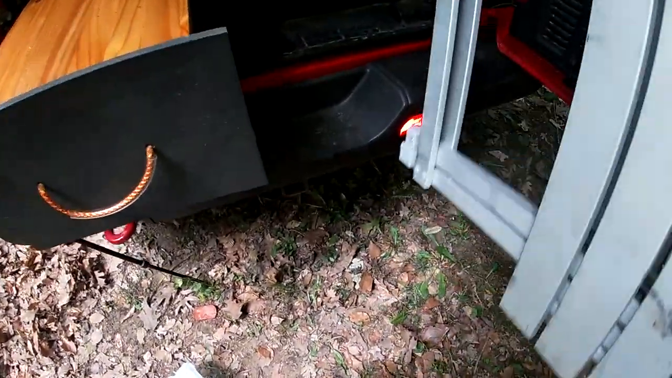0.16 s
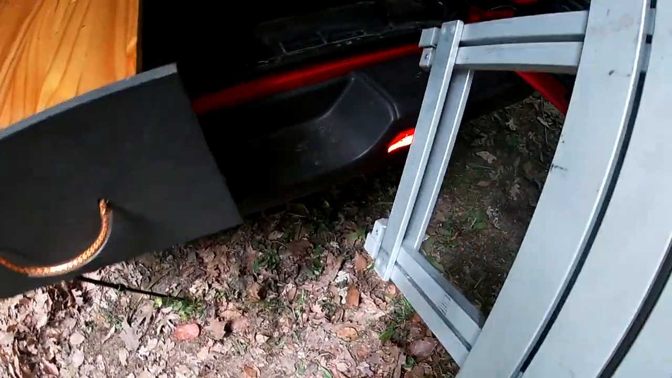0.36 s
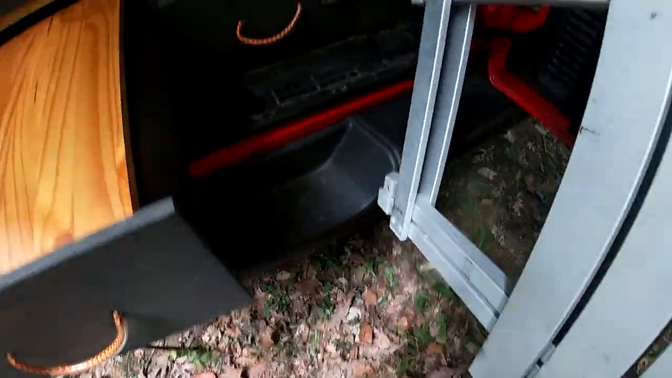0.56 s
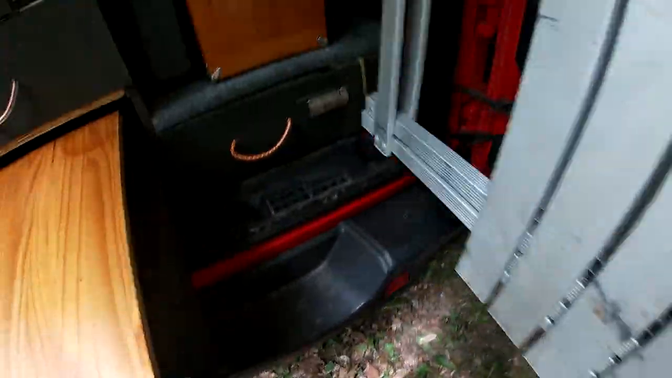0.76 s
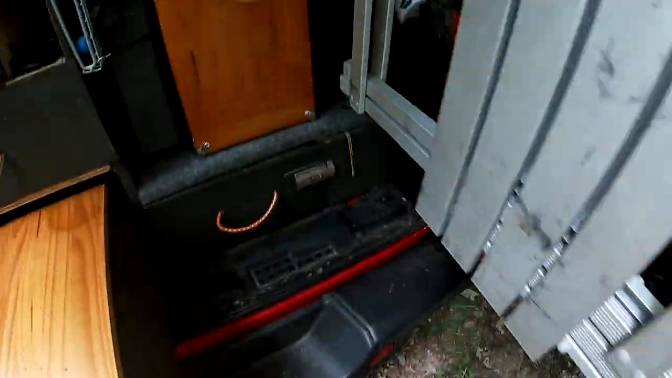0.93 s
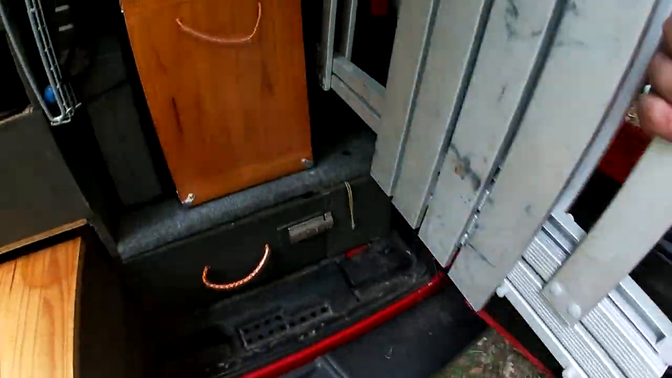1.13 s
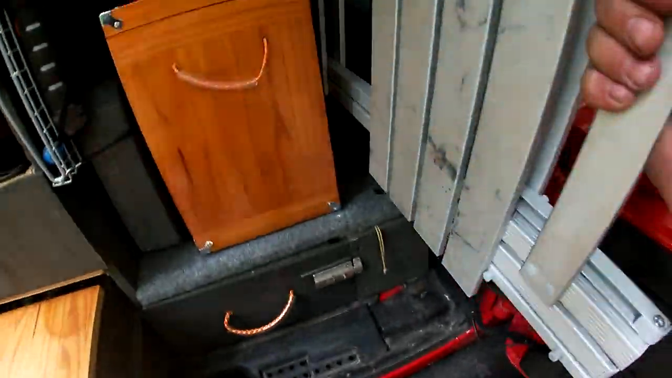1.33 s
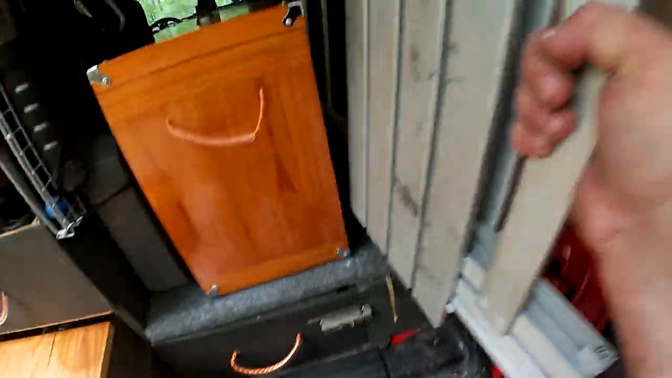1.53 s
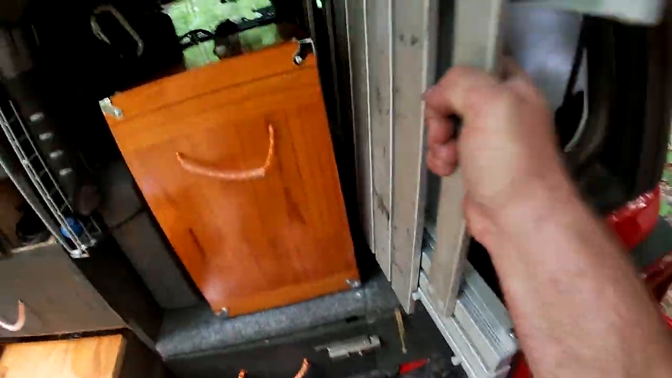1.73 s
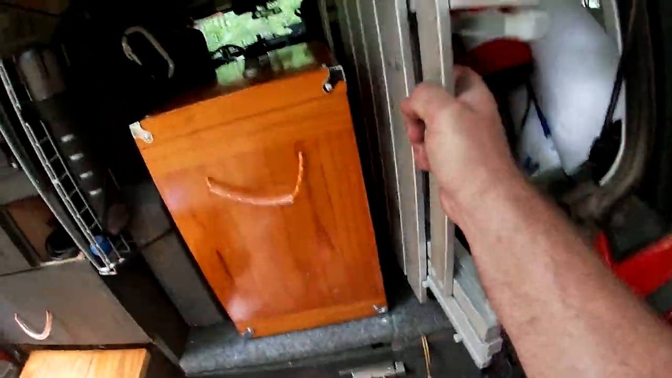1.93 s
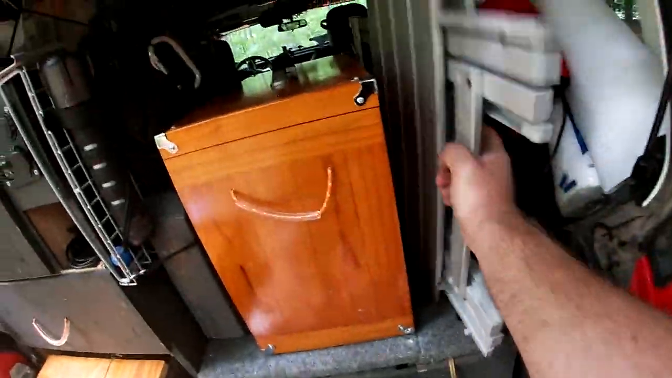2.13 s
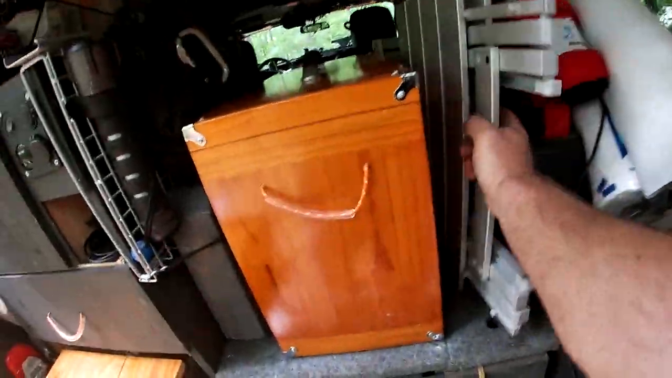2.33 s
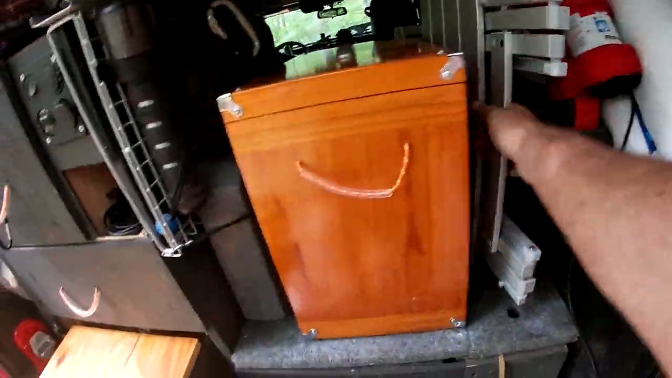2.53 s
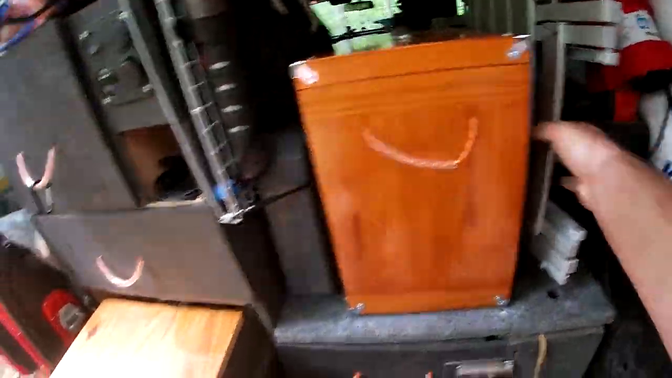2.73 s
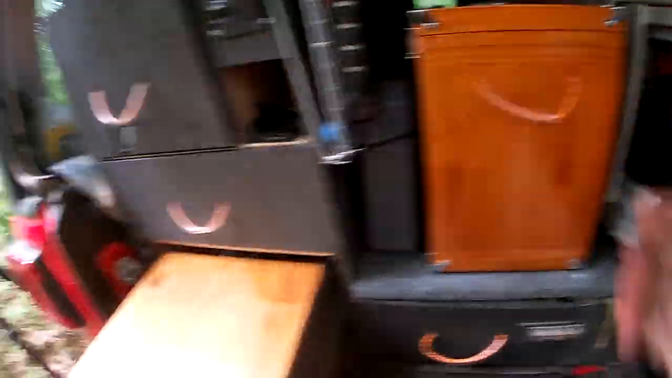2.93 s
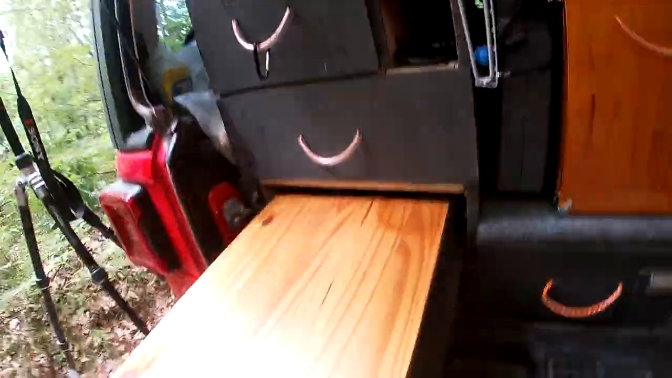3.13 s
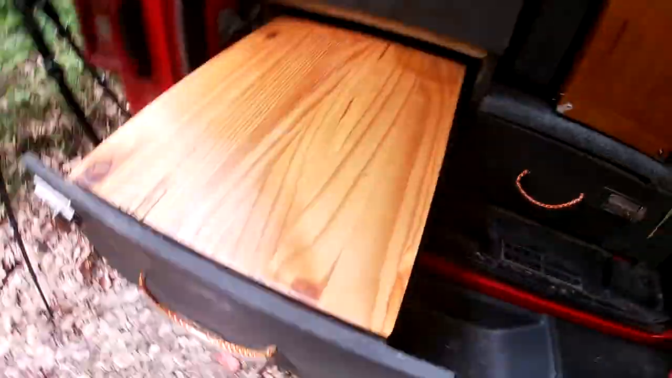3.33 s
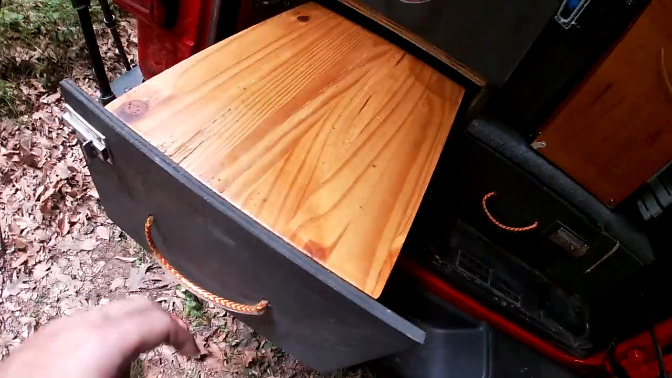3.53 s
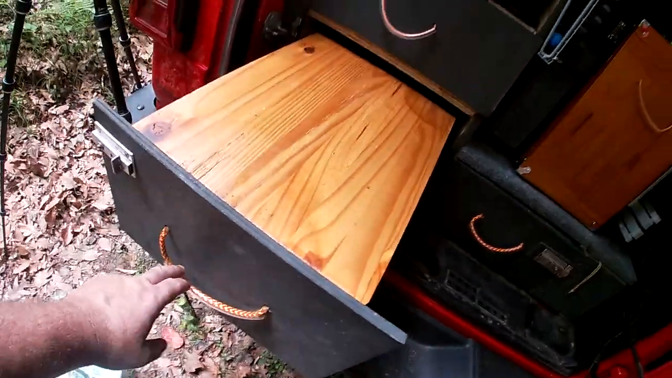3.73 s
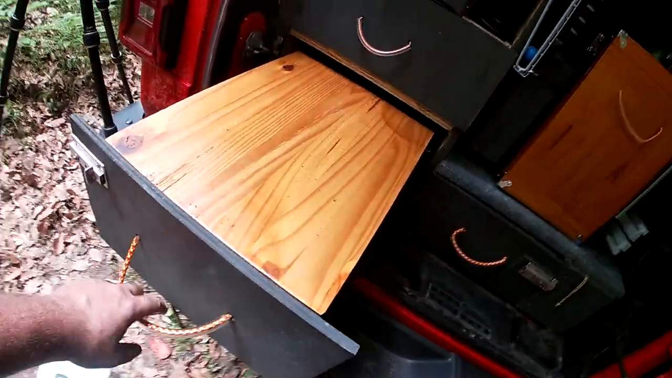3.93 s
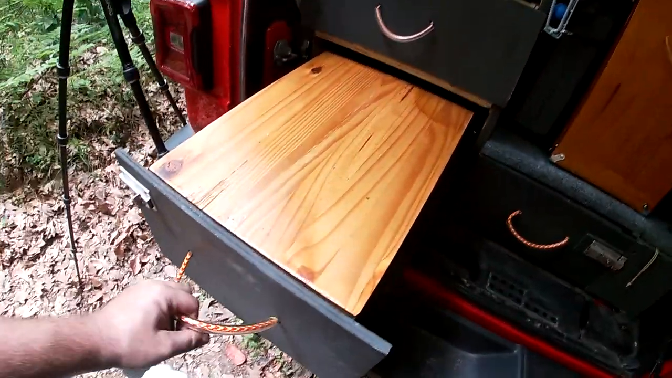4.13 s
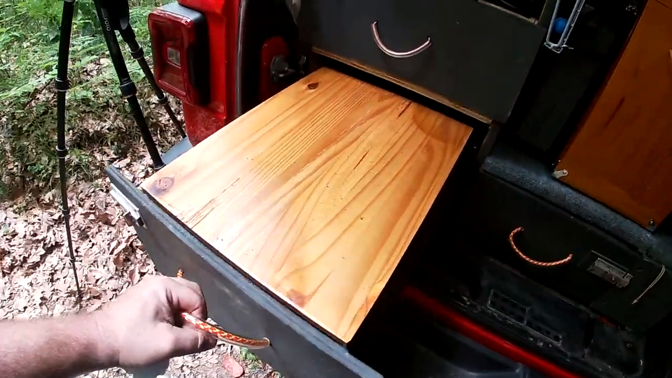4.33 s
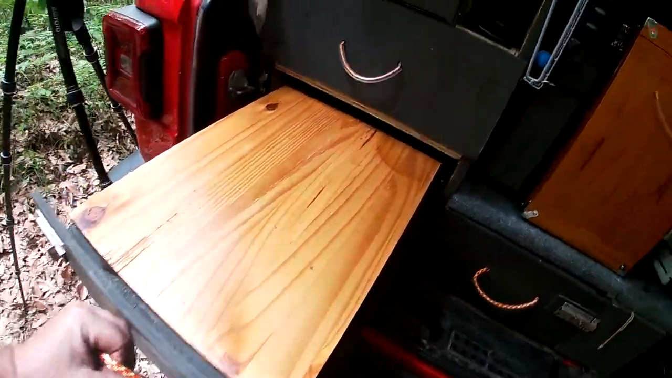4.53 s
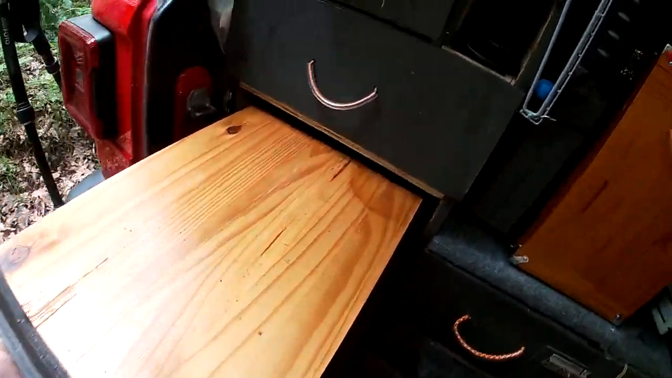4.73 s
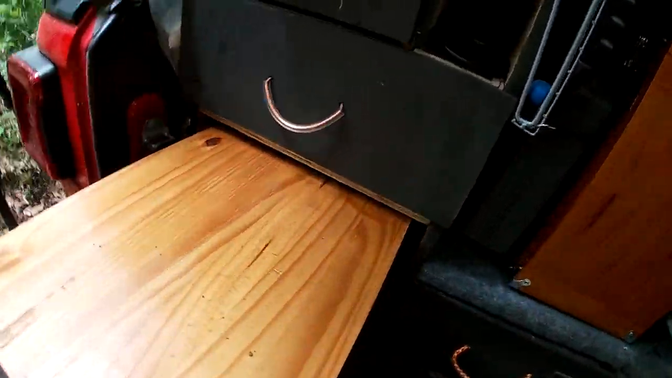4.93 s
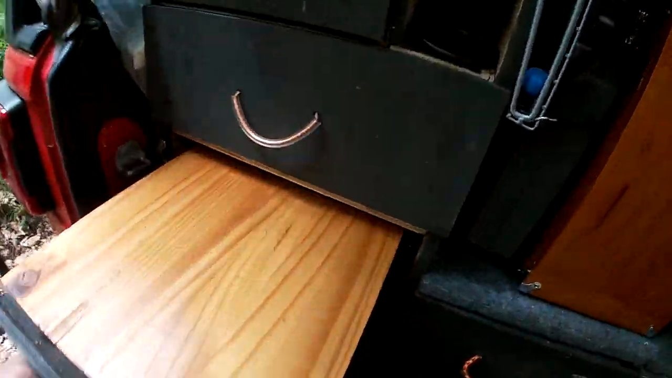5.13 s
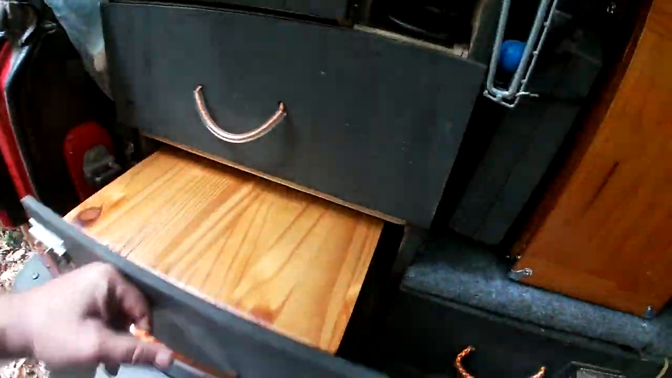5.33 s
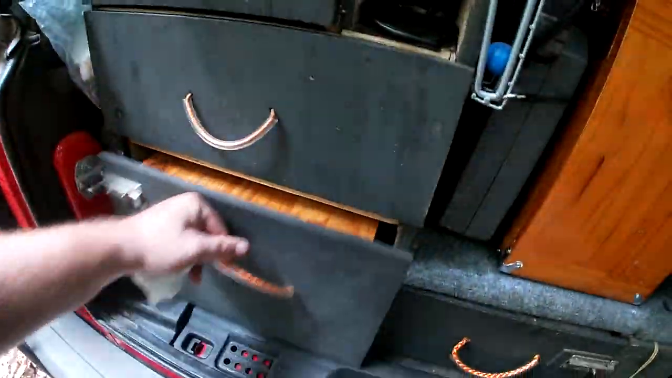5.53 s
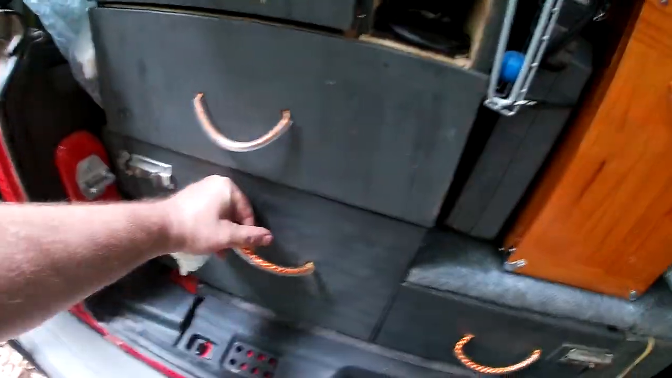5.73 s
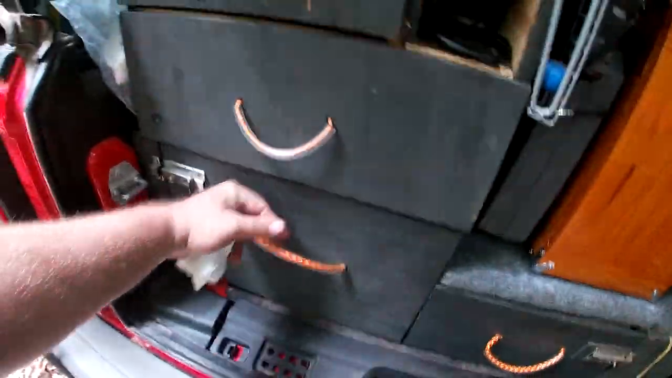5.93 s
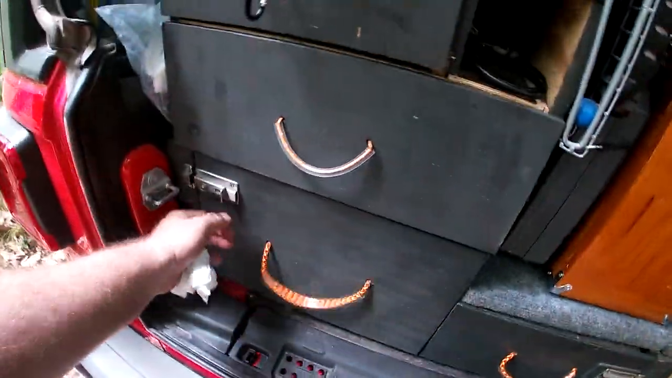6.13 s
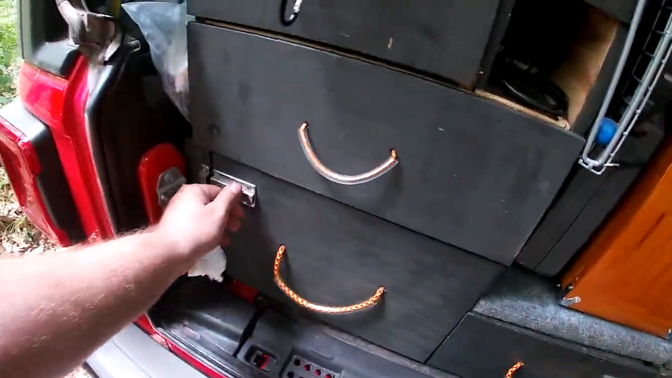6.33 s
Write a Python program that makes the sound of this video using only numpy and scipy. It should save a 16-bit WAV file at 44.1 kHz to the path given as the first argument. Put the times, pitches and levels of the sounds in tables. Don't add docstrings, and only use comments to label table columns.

```python
import sys
import numpy as np
from scipy import signal
from scipy.fft import rfft, irfft, next_fast_len
from scipy.io import wavfile
from scipy.ndimage import uniform_filter1d, map_coordinates

SR = 44100
rng = np.random.default_rng(int(sys.argv[2]) if len(sys.argv) > 2 else 0)


def log_audio(samples):
    frames = np.atleast_2d(samples).T
    limited = np.clip(frames, -1, 1)
    pcm = np.round(limited * 32767).astype(np.int16)
    wavfile.write(sys.argv[1], SR, pcm)


def invert_db(level):
    return 10 ** (np.asarray(level, dtype=float) / 20)


N = 285327


def unit(x):
    return x / np.sqrt(np.mean(x ** 2) + 1e-20)


def curves(rows):
    s, *columns = np.transpose(rows)
    return [np.interp(np.arange(N) / SR, s, column) for column in columns]


def wobble(rate):
    knots = rng.standard_normal(int(N * rate / SR) + 4)
    return map_coordinates(knots, [np.arange(N) * rate / SR])


def swells(rows):
    t = np.arange(N) / SR
    total = np.zeros(N)
    for s, hold, db, rise, fall in rows:
        away = np.maximum((s - t) / rise, (t - s - hold) / fall)
        total += invert_db(db - 20 * np.maximum(0, away))
    return total


def shape(points):
    f, db = np.transpose(points)
    return lambda hz: invert_db(np.interp(np.log(hz + 1), np.log(f), db))


def body(peaks):
    high_hz, low_hz = 1.6 * peaks[-1][0], 0.5 * peaks[0][0]

    def response(f):
        modes = 0
        for k, (centre, width, db) in enumerate(peaks):
            damping = 1j * f * width
            modes = modes + (-1) ** k * invert_db(db) * damping / (centre * centre - f * f + damping)
        return modes / (1 + 1j * f / high_hz) ** 2 * (1j * f / (low_hz + 1j * f)) ** 2

    return response


def filtered(x, response):
    m = next_fast_len(N + SR // 2)
    gain = response(np.fft.rfftfreq(m, 1 / SR))
    gain = gain / np.sqrt(np.mean(abs(gain) ** 2))
    return irfft(rfft(x, m) * gain, m)[:N]


def gritty(spread_db, clump_db, clump_rate):
    uneven = np.minimum(rng.standard_exponential(N), 2 * np.pi)
    sizes = invert_db(spread_db * uneven + clump_db * wobble(clump_rate))
    return unit(sizes * rng.standard_normal(N))


def patchy(x, depth_db):
    z = signal.stft(x, nperseg=512)[2]
    field = uniform_filter1d(uniform_filter1d(rng.standard_normal(z.shape), 12, 0), 8, 1)
    return unit(signal.istft(z * invert_db(depth_db * unit(field)), nperseg=512)[1][:N])


def bursts(times, levels_db, t60s, rise):
    out, t = np.zeros(N + SR), np.arange(SR // 2) / SR
    for s, db, t60 in zip(times, levels_db, t60s):
        fade = invert_db(db - 60 * t / max(t60, .004)) * (1 - np.exp(-t / rise))
        out[round(s * SR):][:len(t)] += fade * rng.standard_normal(len(t))
    return out[:N]


def rings(times, levels_db, modes_hz, t60s):
    out, t = np.zeros(N + SR), np.arange(SR // 5) / SR
    for s, db, hz, t60 in zip(times, levels_db, modes_hz, t60s):
        tones = np.sin(2 * np.pi * hz[:, None] * t) * invert_db(3.1 * rng.standard_normal((len(hz), 1)))
        fade = invert_db(db - 60 * t / max(t60, .004)) * (1 - np.exp(-t / .0005))
        out[round(s * SR):][:len(t)] += fade * tones.sum(axis=0)
    return out[:N]


def pushed_rings(rows):
    out, t = np.zeros(N + SR), np.arange(SR // 2) / SR
    for s, db, hz, t60, rise in rows:
        cycles = hz * t + 0.25 * (1 - np.exp(-t / 0.0032))
        beating_db = 0.58 * np.sin(47 * t)
        fade = invert_db(db - 60 * t / t60 + beating_db) * (1 - np.exp(-t / rise))
        out[round(s * SR):][:len(t)] += fade * np.sin(2 * np.pi * cycles)
    return out[:N]


def knocks(rows, crack_colour, parts, board_db):
    s, db, clack_db, thud_db, t60 = np.transpose(rows)
    large, middle, thin = parts
    tick = bursts(s, db - 7.0, 0.0038 + 0 * s, rise=.0001)
    tail = bursts(s, db - 7.5, 0.81 * t60, rise=0.00074)
    crack = filtered(tick + tail, shape(crack_colour))
    clack = filtered(bursts(s, db + clack_db + 0.5, t60, rise=0.00033), body(thin))
    board = filtered(bursts(s, db + clack_db + board_db + 2.0, 1.35 * t60, rise=0.00073), body(middle))
    push_at = np.round((s - .0015) * SR).astype(int)
    push_size = invert_db(db + thud_db + 25.5) * (-1) ** np.arange(len(s))
    thud = filtered(np.bincount(push_at, push_size, N), body(large))
    loose_hz = np.exp(rng.uniform(np.log(1100), np.log(5000), (len(s), 6)))
    rattle = rings(s, db - 17, loose_hz, .5 * t60)
    return crack + rattle + clack + board + thud


# f/Hz, level/dB (per Hz)
WOODS_COLOUR = [(30, -57), (60, -44), (120, -10.5), (190, -1.5), (300, -8.5), (500, -15), (1500, -22.5),
                (4000, -19), (9000, -50), (14000, -93)]


def woods():
    return invert_db(-52 + 2.3 * wobble(5)) * filtered(rng.standard_normal(N), shape(WOODS_COLOUR))


# t/s, hold/s, level/dB, rise/s, fall/s
AIR = [(.26, .01, -39.5, .25, .12), (2.05, .05, -52, 0.48, .3), (2.26, 0.087, -17.5, .11, 0.13),
       (2.46, .01, -33.5, 0.087, 0.32), (3.17, 0.26, -37, 0.12, 0.13), (3.61, 0.078, -35, 0.064, 0.4),
       (4.98, .02, -20, .12, .25), (5.17, .01, -19, 0.036, .09), (5.37, 0.011, -15, 0.14, 0.15),
       (5.56, .03, -24, 0.18, .06), (5.77, 0.009, -13.5, .12, 0.24)]


def moving_air():
    colour = shape([(12, -8), (25, -6.5), (48, 3.5), (75, -18.0), (150, -48), (400, -120)])
    return (swells(AIR) + invert_db(-73)) * filtered(rng.standard_normal(N), colour)


# t/s, hold/s, level/dB, rise/s, fall/s
STEPS = [(.58, 0.044, -37.5, 0.081, 0.1), (.96, .03, -49, 0.05, 0.7), (1.1, 0.056, -33, 0.24, 0.01),
         (3.65, 0.043, -39, 0.06, 0.29), (3.86, 0.019, -31.5, 0.14, 0.16), (4.15, 0.14, -46, 0.27, 0),
         (4.34, 0.15, -42.5, 0.077, 0.04)]
# t/s, hold/s, level/dB, rise/s, fall/s
BRUSHES = [
    (0.0, 0.0089, -32, .1, 0.26),
    (1.67, .02, -46, 0.047, 0.43),
    (1.96, 0.018, -32.5, 0.14, 0.1),
    (2.18, .02, -26.5, 0.14, 0.19),
    (2.3, 0.27, -37, 0.31, 0.16),
]
# t/s, level/dB
STIR = [(0.0, -57), (.27, -48), (.5, -48), (.77, -59.5), (1.24, -40.5), (1.56, -43.5), (2.74, -49),
        (3.02, -43.5), (3.59, -42.5), (4.01, -55), (4.64, -50.5), (4.84, -48.5), (5.36, -56), (5.6, -43),
        (5.78, -55), (6.01, -57), (6.47, -47.5)]
# f/Hz, level/dB (per Hz)
LEAVES = [(500, -13.5), (900, -8.5), (1300, -5), (3500, -2.5), (6500, -11), (8500, -13.5), (11000, -24.5),
          (16000, -83)]
CLOTH = [(500, -17), (900, -10), (1400, -6), (3000, -2), (5000, -8), (8000, -14), (11000, -27),
         (16000, -84)]
FIZZ = [(2500, -86), (4000, -9.5), (7000, -1.5), (8500, -1), (10500, -10), (13000, -19), (15600, -20)]
DULL = [(76, -38), (130, -11), (257, -14), (306, 0.5), (460, -2.5), (1240, -6), (1800, -11), (2340, -55),
        (3960, -120)]


def rustle():
    steps, stir = swells(STEPS), invert_db(curves(STIR)[0])
    grains = gritty(spread_db=2.0, clump_db=1.6, clump_rate=110)
    dull_grains = gritty(spread_db=2.5, clump_db=5.0, clump_rate=25)
    crackle = (steps + swells(BRUSHES)) * patchy(filtered(grains, shape(LEAVES)), depth_db=1.5)
    swish = invert_db(-2.5) * stir * patchy(filtered(grains, shape(CLOTH)), depth_db=1.5)
    fizz = (invert_db(-5.5) * steps + invert_db(-14) * stir) * filtered(grains, shape(FIZZ))
    dull = (invert_db(-10) * steps + invert_db(-18) * stir) * filtered(dull_grains, shape(DULL))
    return crackle + swish + fizz + invert_db(4.5) * dull


# t/s, level/dB
# (peak), f/Hz
SNAPS = [(0.5716, -21.5, 4360), (0.6898, -30, 4930), (0.7297, -34.5, 7210), (0.7911, -35.5, 3160),
         (0.8214, -34, 3140), (0.8799, -30, 5470), (0.9058, -30.5, 3150), (0.9368, -22, 3790),
         (1.0091, -23, 3040), (1.0294, -21, 2890), (1.1159, -15, 4200), (1.1644, -22, 4840),
         (1.1894, -24, 4980), (1.2471, -23.5, 5300), (1.3648, -20.5, 2440), (1.3994, -29, 2570),
         (1.4114, -24, 2660), (1.4484, -29, 2700), (1.4985, -24.5, 2690), (1.5743, -28, 2270),
         (2.7861, -30, 6810), (3.1697, -30, 4900), (3.3907, -26.5, 8600), (3.4331, -14.5, 2950),
              (3.6142, -26, 2990), (3.6426, -21.5, 7770), (3.9649, -18.5, 5080), (4.0287, -32, 3130),
              (4.0617, -21.5, 5460), (4.1814, -26, 5030), (4.3844, -27, 2260), (4.4294, -28.5, 4280),
              (6.0944, -44, 2230), (6.3974, -36, 9880)]


def snaps():
    s, db, hz = np.transpose(SNAPS)
    puffs = bursts(s, db - 4.0, 0.022 + 0 * s, rise=0.001)
    ping_hz = hz[:, None] * rng.normal(1, 0.063, (len(s), 3))
    pings = rings(s, db - 15, ping_hz, .015 + 0 * s)
    return filtered(puffs, shape(LEAVES)) + invert_db(-9.5) * filtered(puffs, shape(FIZZ)) + pings


# t/s, hold/s, level/dB, rise/s, fall/s
PRESSES = [
    (2.8, .05, -60, .06, .06),
    (2.95, .03, -60, .04, .04),
    (3.54, .02, -52, .04, .04),
    (4.19, .04, -45, .05, .06),
    (4.27, .05, -44, .04, .05),
    (5.785, .03, -27, .02, .1),
    (5.96, .02, -48, .03, .04),
]
# f/Hz, width/Hz, level/dB
TRIM = [(160, 60, -3), (320, 90, 0), (480, 150, -3), (720, 250, -8)]


def presses():
    crunch = gritty(spread_db=2.5, clump_db=4.0, clump_rate=50)
    return swells(PRESSES) * filtered(crunch, body(TRIM))


SHELL_HZ = 1170
# t/s, level/dB (peak), rise/s
TAPS = [(2.808, -43, 0.0082), (3.067, -31, 0.0033), (3.18, -36, 0.0054), (3.307, -35, 0.0036),
        (3.342, -28, 0.004), (3.347, -13.5, 0.0026), (3.407, -26, 0.0031), (3.433, -15.5, 0.0023),
        (4.44, -37, 0.0059), (4.721, -43.5, 0.0047)]


def taps():
    out, t = np.zeros(N + SR), np.arange(SR // 2) / SR
    for s, db, rise in TAPS:
        blow = t / rise * np.exp(1 - t / rise)
        tail = 0.12 * np.exp(-t / 0.0099) * (1 - np.exp(-t / rise))
        tone = np.sin(2 * np.pi * SHELL_HZ * rng.normal(1, 0.026) * t)
        out[round(s * SR):][:len(t)] += invert_db(db) * (blow + tail) * tone
    return out[:N]


# t/s, hold/s, level/dB, rise/s, fall/s
CREAK = [
    (2.72, .05, -56, 0.092, .55),
    (3.35, 0.026, -41, 0.27, 0.19),
    (3.55, 0.52, -63, 0.33, .1),
    (4.39, .01, -51, 0.22, 0.17),
    (4.74, .01, -46, 0.096, 0.12),
]


def strap_creak():
    tone = filtered(rng.standard_normal(N), body([(SHELL_HZ, 110, 0)]))
    return swells(CREAK) * invert_db(3.8 * wobble(23)) * tone


# t/s, hold/s, level/dB, rise/s, fall/s
RUMBLE = [
    (3.26, 0.041, -28.5, 0.02, 0.17),
    (5.8, 0.026, -30.5, .03, 0.195),
    (3.62, .06, -49, .02, .3),
    (3.38, .03, -46, .03, .1),
    (4.49, .03, -42, .02, .08),
    (2.52, .08, -36, .05, .1),
]


def chest_rumble():
    low = filtered(rng.standard_normal(N), body([(85, 67, -2.0), (257, 200, -18)]))
    return swells(RUMBLE) * invert_db(4.2 * wobble(45)) * low


# t/s, level/dB (peak), f/Hz, t60/s, rise/s
BUMPS = [(.155, -22, 319.7, 0.2, 0.0044), (.222, -20, 317.6, 0.55, 0.0013), (.225, -26, 430, .15, .003),
         (.26, -28, 370, .2, .005), (1.475, -38, 850, .04, .002), (0.506, -21.5, 307, 0.36, 0.041),
         (1.885, -1, 446, 0.0096, 0.00022), (2.155, -10.5, 426, 0.026, .0003),
         (1.712, -18, 1283, 0.28, .003), (1.81, -17, 1260, .16, 0.0037), (3.239, 1.5, 55.5, 0.089, 0.0011),
         (3.298, -3, 66, 0.1, 0.0073), (3.434, -19, 544, 0.04, 0.0019), (3.44, -18.5, 117, 0.047, 0.0029),
         (4.308, -20, 310, 0.065, 0.013), (4.485, -22, 174, 0.12, 0.016)]


def bumps():
    return pushed_rings(BUMPS)


# t/s, level/dB
DRAGS = [
    [(0.0, -42.5), (0.3, -40), (0.468, -49), (0.72, -66)],
    [(1.57, -51), (1.652, -27), (1.77, -36), (1.836, -27.5), (2.02, -37.5), (2.17, -34), (2.368, -30),
     (2.56, -32.5), (2.75, -50)],
    [(4.84, -53), (4.904, -43.5), (5.058, -33), (5.178, -24), (5.34, -19.5), (5.52, -19.5), (5.666, -27),
     (5.76, -30), (6.0, -76.5)],
]
# boom level/dB, board level/dB, scrape level/dB
DRAG_MIX = [
    (-1, 4.5, -5),
    (-1.1, -6, -2),
    (-1, 1.5, -1.5),
]
# t/s, hold/s, level/dB, rise/s, fall/s
JOLTS = [
    (4.91, 0.0083, -16.5, 0.017, 0.21),
    (5.17, 0.11, -16, 0.2, 0.074),
    (5.42, 0.0089, -19, 0.075, .2),
    (5.52, .01, -15, 0.01, 0.087),
    (5.67, 0.011, -19, 0.074, 0.051),
    (5.742, 0.0092, -13.5, 0.019, 0.083),
    (5.792, 0.0082, -27, .05, 0.16),
]
# f/Hz, width/Hz, level/dB
LEGS = ([(174, 91, 0), (213.7, 11, 8.5)], [(310, 31, 0.5), (520, 110, -14), (786, 110, -9)], [(1071, 34, 1),
        (1196, 21, 6.5), (1310, 230, -4.5), (2000, 390, -7), (2740, 810, -12.5)])
TABLE = ([(104.7, 22.6, 2), (140, 32, 0), (200.8, 22.4, 4.5)], [(313, 36, 3), (354, 126, -0.5),
         (751, 128, 1.5), (890, 91, -1)], [(1034, 134, -4.5), (1248, 85, 1), (1430, 136, -3),
         (1680, 330, -7), (2164, 270, -7), (2510, 150, -7), (2850, 720, -12.5)])
BOX = ([(68, 22.6, -2), (105, 36.4, -2.5), (147.7, 35.5, -4), (209, 50, -6)], [(309, 82, -0.5),
       (399, 62, 3.5), (517, 85, -1.5), (810, 550, -8.5)], [(987, 233, -0.5), (1350, 330, -3.5),
       (1700, 290, -2.5), (2390, 1030, -10.5), (2920, 370, -9), (4260, 1500, -26)])


def dragging():
    t, out = np.arange(N) / SR, np.zeros(N)
    judder = wobble(35)
    movements = zip(DRAGS, DRAG_MIX, (LEGS, TABLE, BOX), ([], [], JOLTS))
    for rows, (boom_db, board_db, scrape_db), (large, middle, thin), jolts in movements:
        effort = invert_db(curves(rows)[0])
        boom = filtered(gritty(spread_db=2.0, clump_db=2.0, clump_rate=33), body(large))
        board = filtered(gritty(spread_db=0.5, clump_db=2.5, clump_rate=55), body(middle))
        scrape = filtered(gritty(spread_db=3.5, clump_db=3.0, clump_rate=110), body(thin))
        board *= invert_db(0.42 * judder)
        scrape *= invert_db(1.9 * judder)
        mix = (invert_db(boom_db) * effort + swells(jolts)) * boom
        mix += effort * (invert_db(board_db) * board + invert_db(scrape_db) * scrape)
        since_start, to_stop = t - rows[0][0] + 0.0048, rows[-1][0] - t
        moving = np.clip(np.minimum(since_start, to_stop) / 0.026, 0, 1)
        out += moving * mix
    return out


def runner():
    effort_db = curves(DRAGS[2])[0]
    fast = 1 / (1 + invert_db(3.5 * (-25 - effort_db)))
    grains = invert_db(2.4 * wobble(45)) * gritty(spread_db=4.0, clump_db=3.0, clump_rate=88)
    slow_band = filtered(grains, body([(1190, 190, 0)]))
    fast_band = filtered(grains, body([(1810, 190, 0)]))
    started = np.arange(N) / SR > DRAGS[2][0][0]
    return started * invert_db(effort_db - 12) * ((1 - fast) * slow_band + fast * fast_band)


# f/Hz (at full speed), level/dB (over the effort)
STREAKS = [(620, -11), (980, -9), (1300, -15), (1750, -9), (2300, -13), (3000, -20)]


def rollers():
    effort_db = curves(DRAGS[2])[0]
    slow = np.clip((effort_db.max() - effort_db) / 20, 0, 1)
    lines = np.zeros(N)
    for hz, db in STREAKS:
        line_hz = hz * (1 - .12 * slow + .05 * wobble(14))
        flicker = invert_db(db + 4.0 * wobble(30)) * wobble(140)
        lines += flicker * np.sin(2 * np.pi * np.cumsum(line_hz) / SR)
    started = np.arange(N) / SR > DRAGS[2][0][0]
    return started * invert_db(effort_db - 4.0) * lines


# t/s, level/dB (peak), f/Hz, t60/s, rise/s
THUMPS = [
    (4.912, -1.5, 70, 0.17, 0.0028),
    (5.186, -1, 70, 0.24, 0.0045),
    (5.293, 0, 69.5, 0.23, .004),
    (5.41, -3.5, 75, .2, .004),
    (5.514, 0, 95, 0.082, .002),
    (5.529, -3, 68, 0.32, 0.0037),
    (5.652, -5.5, 99.5, 0.22, 0.0052),
    (5.737, 0, 85, 0.12, .002),
]


def drawer_thumps():
    return pushed_rings(THUMPS)


# start t/s, end t/s, then f/Hz at start, middle and end
ARCHES = [(6.1, 6.47, 6400, 9050, 9750), (6.14, 6.47, 9700, 11350, 10900),
          (6.25, 6.47, 13000, 12650, 12700), (6.04, 6.2, 9600, 12300, 15000),
          (6.15, 6.38, 13900, 15000, 13400), (6.33, 6.47, 6800, 6650, 6700), (6.38, 6.46, 9350, 9300, 9200),
          (6.39, 6.47, 13900, 14200, 14400)]
ARCH_LEVELS = [-60, -64, -73, -77, -79, -62, -65, -79]


def bolt_squeak():
    t, out = np.arange(N) / SR, np.zeros(N)
    for (start, end, *hz), db in zip(ARCHES, ARCH_LEVELS):
        progress = np.clip((t - start) / (end - start), 0, 1)
        arch_hz = np.polyval(np.polyfit([0, .5, 1], hz, 2), progress)
        line_hz = arch_hz + 110 * wobble(25) + 70 * wobble(150)
        gate = np.clip(np.minimum(t - start, end + .02 - t) / .03, 0, 1)
        out += gate * invert_db(db + 6.5 * wobble(30)) * np.sin(2 * np.pi * np.cumsum(line_hz) / SR)
    return out


# t/s, crack level/dB (peak), clack level/dB and
# thud level/dB (both over the crack), t60/s
FOLDING = [(.0845, -22, 5, -3.5, 0.089), (.1045, -35, 7, 7, 0.45), (.1524, -10.5, 2.5, -4, .15),
           (.1305, -28, -10, -20, .03), (.2195, -16, 1.2, -11, 0.12), (.2486, -22, -15, -8, 0.1),
           (.3192, -28.5, -23, -18, 0.088), (.396, -35.5, -15, -16, .15), (.4946, -25.5, 4.5, -32, 0.13)]
SLATS = [(1.6045, -4, -5.5, -4, .15), (1.6553, -6.5, -12, -19, 0.098), (1.6874, -17.5, -6.5, -25, 0.15),
         (1.711, -6.5, -9, -29, 0.078), (1.7446, -15, -5.5, -16, 0.077), (1.7605, -20, -9, -22, 0.055),
         (1.7864, -25, -7, -20, .06), (1.8035, -4, -4.5, -1.5, 0.13), (1.864, -16, -12, -20, 0.043),
         (1.8836, -15.5, -3.5, -8, 0.05), (1.9512, -10, -0.7, -8, 0.26), (1.9728, -6, -3.5, -7.5, 0.2),
         (1.988, -7, -13, -5.5, 0.08), (2.0266, -8.5, -4.5, -12, 0.069), (2.1086, -26, -5, -7, .05),
         (2.1131, -21, -5, -4, .06), (2.155, -15, -6, 1, 0.078), (2.1941, -9, 0.9, 6.5, 0.2),
         (2.2191, -2.5, -7.5, 5, 0.25), (2.2494, -5, -3, 0.5, 0.044), (2.2702, -9, -6.5, -6, 0.18),
         (2.3215, -4.5, -4, -3, .16), (2.3735, -17, -4, -11, 0.043), (2.3785, -12.5, -3, -6.5, .088),
         (2.4434, -23, -7, 0, 0.12), (2.4719, -22.5, 3, -7, 0.16), (2.601, -23.5, -7, -39, 0.23),
         (2.6615, -19, -2.5, -37, 0.13)]
# f/Hz, level/dB (per Hz)
SLAT_CRACK = [(1410, -35), (2400, 1), (3030, -5.5), (3860, 0), (5360, -6.5), (7050, -8), (8560, -11.5),
              (15500, -35)]


def table_knocks():
    legs = knocks(FOLDING, SLAT_CRACK, LEGS, board_db=-7.0)
    return legs + knocks(SLATS, SLAT_CRACK, TABLE, board_db=-7.5)


# t/s, crack level/dB (peak), clack level/dB and
# thud level/dB (both over the crack), t60/s
DRAWER = [(4.8659, -47.5, 15, 22, 0.032), (4.8932, -12, 4, 12.5, 0.078), (4.9086, -6.5, -13.5, -2, .08),
          (4.994, -32, 9, 26.5, 0.072), (5.026, -27.5, 2, 14.5, 0.073), (5.0868, -35, 3, 2, 0.037),
          (5.1018, -32, 5, 5, 0.046), (5.1066, -41.5, 21, 10, .042), (5.152, -5.5, -7.5, -2, 0.07),
          (5.1784, -10.5, -1, 9.5, 0.12), (5.2374, -23, 1, 0, 0.035), (5.2525, -14, -3, -1, .04),
          (5.2606, -0.8, -5.5, -1.5, 0.049), (5.2861, -17.5, 0, 14, 0.07), (5.3362, -25, 4, 0, 0.036),
          (5.3577, -25, 3, 0, .04), (5.39, -13, 0, -1, 0.042), (5.453, -21, 0, -2, 0.055),
          (5.475, -12.5, -2.5, -11, 0.096), (5.51, -10, -2, 11, 0.13), (5.524, -19, -3, -5, 0.046),
          (5.6246, -30, 0, 3, .05), (5.6974, -27, -3, 0, .05), (5.7325, 0.6, -6, -3, 0.054)]
BOLT = [
    (4.597, -25.5, -8.5, -6, 0.069),
    (5.9503, -37.5, -14, 0, 0.054),
    (6.2478, -5.5, -6, -25, 0.061),
    (6.344, -35, -16, -14, .055),
]
# f/Hz, level/dB (per Hz)
BOLT_CRACK = [(1410, -12.5), (2400, 0), (3800, -3.5), (4180, -2), (5930, -13), (7380, -20), (11800, -34),
              (15500, -60)]
# f/Hz, width/Hz, level/dB
LATCH = ([(187, 23, 0)], [(296, 43, 3.5), (472, 22, 4.5), (740, 240, -3)], [(1240, 150, 10.5),
         (1680, 320, 3), (2180, 210, -19)])


def drawer_knocks():
    box = knocks(DRAWER, BOLT_CRACK, BOX, board_db=-0.2)
    return box + knocks(BOLT, BOLT_CRACK, LATCH, board_db=-6.0)


def scene():
    background = woods() + moving_air() + rustle() + snaps() + presses()
    camera = taps() + strap_creak() + chest_rumble() + bumps()
    sliding = dragging() + runner() + rollers() + drawer_thumps()
    blows = bolt_squeak() + table_knocks() + drawer_knocks()
    return (background + camera + sliding + blows)[None]


def top_cut(x):
    return signal.sosfilt(signal.butter(12, 15690, fs=SR, output="sos"), x)


def record(dry):
    clipped = dry / (1 + abs(dry) ** 30) ** (1 / 30)
    return top_cut(clipped)


dry = scene()
out = record(dry)
log_audio(out)
```